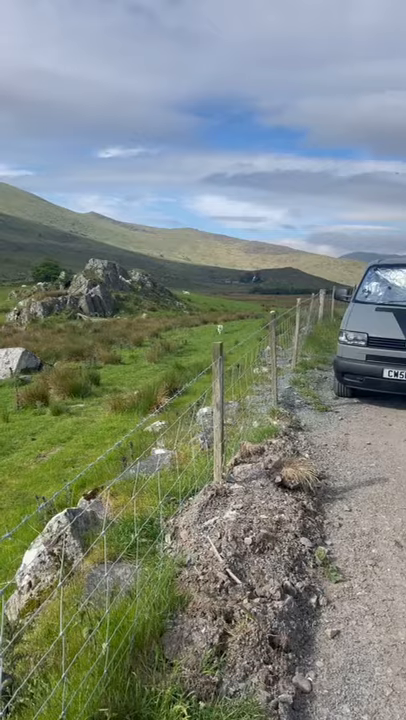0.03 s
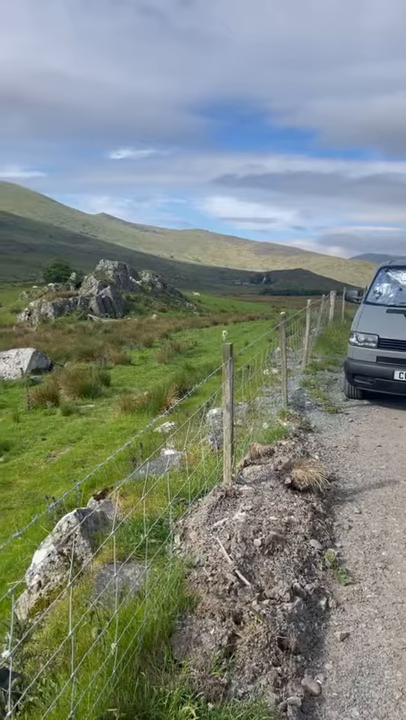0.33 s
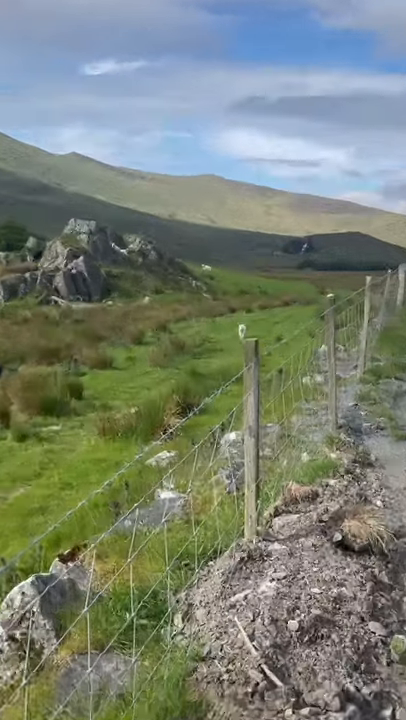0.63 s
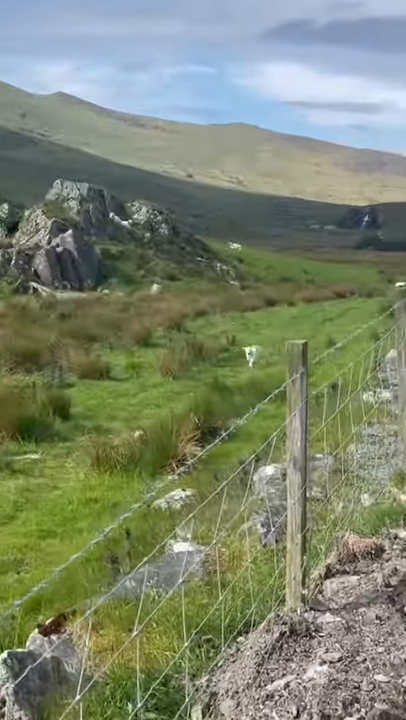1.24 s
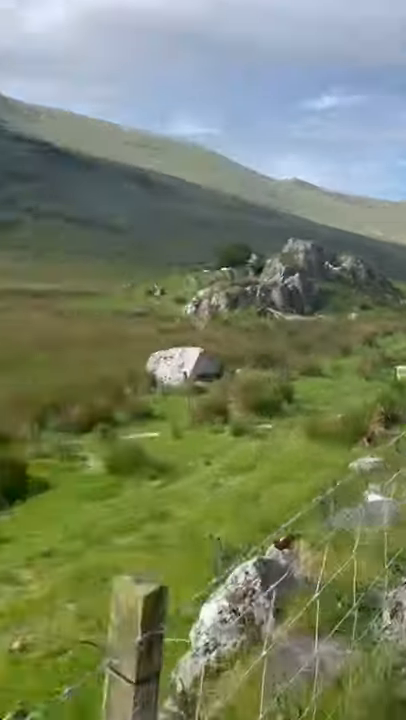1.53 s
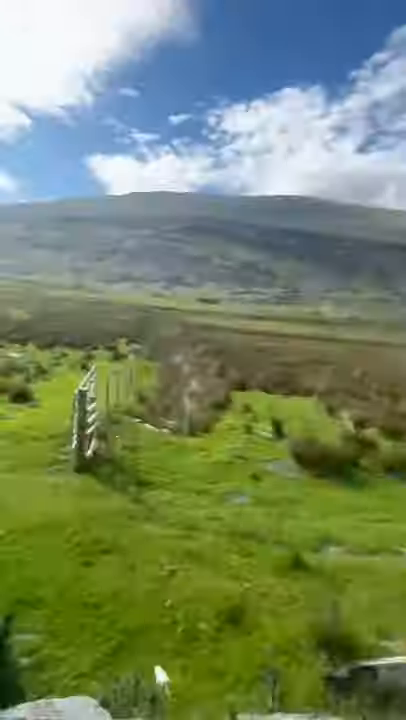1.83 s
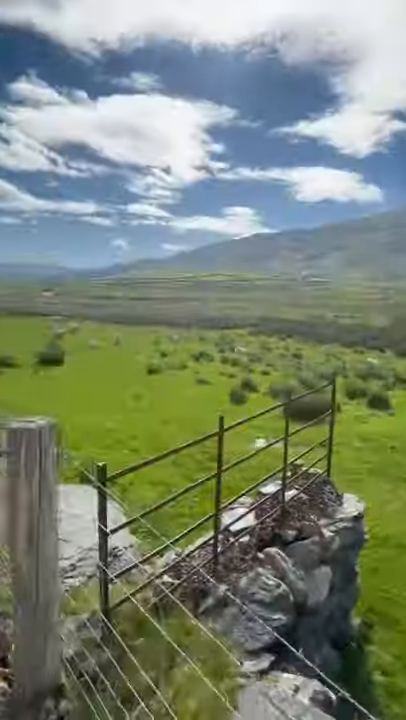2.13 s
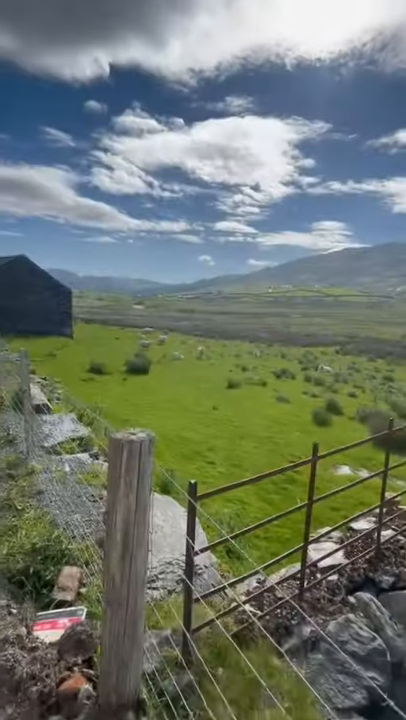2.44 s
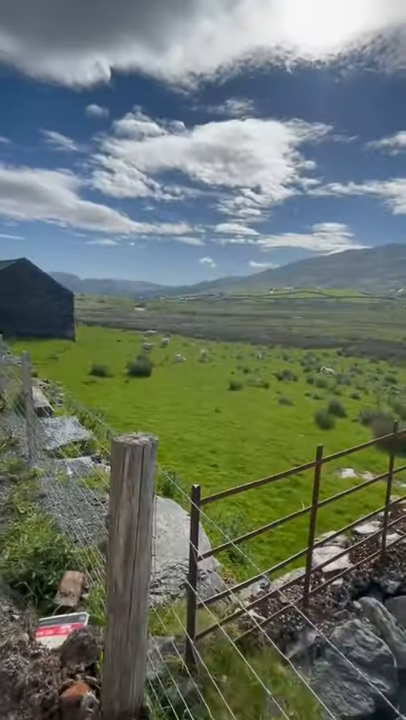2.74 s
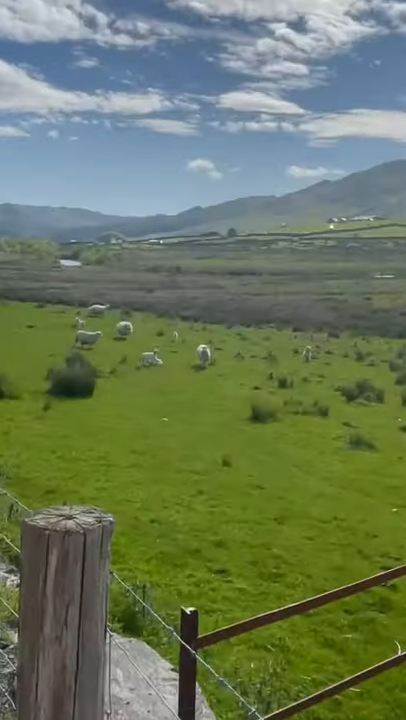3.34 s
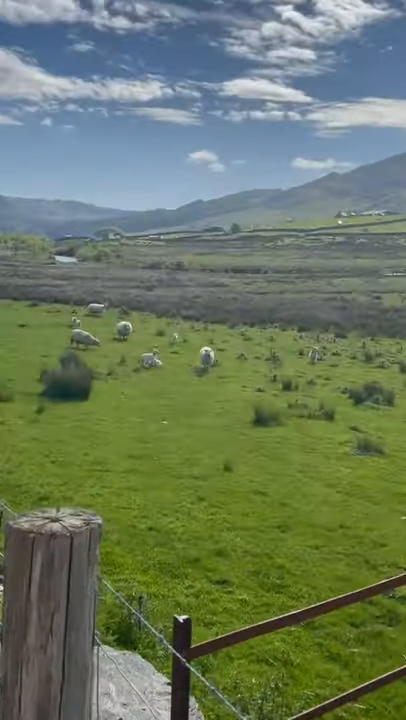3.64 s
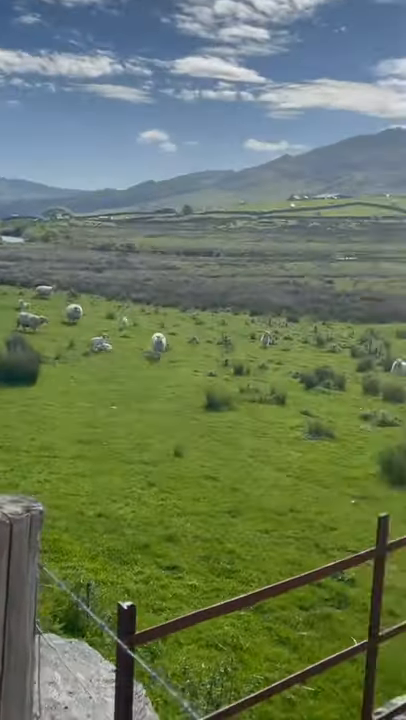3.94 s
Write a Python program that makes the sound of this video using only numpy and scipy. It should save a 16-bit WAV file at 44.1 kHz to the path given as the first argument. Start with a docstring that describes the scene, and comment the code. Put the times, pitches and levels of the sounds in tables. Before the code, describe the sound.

Sheep bleat back and forth, a high lamb and a low ewe, in gusty wind.

```python
"""Sheep on a breezy hill pasture. Over a faint wash of wind in the grass, gusts buffet the microphone
throughout. A lamb bleats, high and quavering: vocal fold pulses and breath ringing in its throat.
A far-off bird whistles up, then down, and the lamb calls again. A ewe answers, low and rattling,
each pulse a separate knock. The lamb's third bleat is long and off to one side, and the ewe
answers once more. Ground and stone walls scatter the calls."""
import sys
import numpy as np
from scipy import signal
from scipy.fft import rfft, irfft
from scipy.io import wavfile
from scipy.ndimage import uniform_filter1d

SR = 44100
rng = np.random.default_rng(int(sys.argv[2]) if len(sys.argv) > 2 else 0)


def file_out(sig):
    """Save sig as 16-bit WAV at sys.argv[1]."""
    # one column per channel
    cols = np.atleast_2d(sig).T
    # limit, then scale
    lim = np.clip(cols, -1, 1)
    pcm = np.round(lim * 32767).astype(np.int16)
    wavfile.write(sys.argv[1], SR, pcm)


N = 176400
T = np.arange(N) / SR
TOP_HZ = 12300  # top of the harmonics and of the whole mix
FLUTTER_DB, FLUTTER_HZ = 2.5, 50  # level flicker in the bands of both voices


def amp(db):
    """Decibels to gain."""
    return 10 ** (np.asarray(db) / 20)


def unit_rms(x):
    """Scales a signal to an rms of one."""
    return x / np.sqrt(np.mean(x ** 2) + 1e-20)


def leveller(x):
    """Holds the running level at one."""
    power = uniform_filter1d(uniform_filter1d(x ** 2, size=600), size=600)
    return x / np.sqrt(abs(power) + 1e-12)


def curve(rows, t, column=1):
    """Automation: one column of a breakpoint table at times t."""
    rows = np.array(rows, float)
    return np.interp(t, rows[:, 0], rows[:, column])


def at_hz(points, hz):
    """Reads a curve along a log frequency axis."""
    f, value = np.transpose(points)
    return np.interp(np.log(hz + 1), np.log(f + 1), value)


def add(mix, start_s, sound):
    """Lays a sound into the mix."""
    part = mix[max(round(start_s * SR), 0):][:len(sound)]
    part += sound[:len(part)]


def wander(size, hz):
    """Smooth random modulation, rms about one, rolling off above hz."""
    f = np.fft.rfftfreq(N, 1 / SR)
    return unit_rms(irfft(rfft(rng.standard_normal(N)) * np.exp(-(f / hz) ** 2), N))[:size]


def eq(x, points, cut_hz=0):
    """Minimum-phase EQ with an optional steep low cut."""
    f = abs(np.fft.fftfreq(4096, 1 / SR))
    gain = amp(at_hz(points, f)) / np.sqrt(1 + (cut_hz / (f + 1)) ** 8)
    log_gain = np.log(np.maximum(gain, 1e-5))
    taps = np.fft.ifft(np.exp(np.conj(signal.hilbert(log_gain)))).real[:2048]
    return signal.fftconvolve(x, taps)[:len(x)]


def resonate(x, hz, width_hz, order=1):
    """A unity-gain resonance that follows hz; higher orders have steeper skirts."""
    carrier = np.exp(2j * np.pi * np.cumsum(hz * np.ones(len(x))) / SR)
    lowpass = signal.butter(order, width_hz / 2, fs=SR, output="sos")
    return 2 * (carrier * signal.sosfilt(lowpass, x / carrier)).real


def pan_bands(x, points):
    """Tilts a sound left or right, band by band."""
    side_db = at_hz(points, np.fft.rfftfreq(N, 1 / SR))
    return irfft(rfft(x) * amp([side_db / 2, -side_db / 2]), N)


def grass_wash():
    """Wind over distant grass: faint, gently swelling stereo noise."""
    # Tone of the wash: freq_hz, gain_db
    tone = [(180, -19.5), (300, 4), (571, -17), (758, -1.5), (990, -1.5), (1310, -4.5), (3260, -27.5),
            (4000, -33), (12800, -41), (22000, -120)]
    centre, left, right = [unit_rms(eq(rng.standard_normal(N), tone)) for _ in range(3)]
    swell = amp(-62.5 + 4.7 * wander(N, hz=3.4))
    return swell * unit_rms(centre + 0.49 * np.array([left, right]))


def mic_wind():
    """Lumpy rumble on the microphone, and short puffs that each push it for a cycle or two."""
    # Tone of the rumble: freq_hz, gain_db
    tone = [(12, 2), (20, -31), (48, 9), (118, -2), (198, -8.5), (439, -22.5), (600, -37), (780, -70),
            (1320, -120)]
    # Rise and fall of the breeze: time_s, level_db
    breeze = [(.2,-52.5),(.7,-55.5),(1.05,-62),(1.3,-48),(1.7,-52.5),(1.88,-37),(2.05,-46.5),(2.3,-43.5),(2.62,-45.5),(2.77,-42.5),(2.95,-44.5),(3.08,-66.5),(3.17,-45.5),(3.55,-47.5),(3.68,-40),(4,-49.5)]
    # Puffs hitting the microphone, and at 0.48 s a low blip as the lamb's first bleat closes: time_s, level_db,
    # pitch_hz
    puffs = [(0.206, -43.5, 79), (.481,-46,605), (0.599, -39.5, 84), (0.836, -42.5, 138.3),
             (1.321, -38.5, 168), (1.852, -55, 95), (1.931, -32, 150), (2.002, -18, 108), (2.015, -25, 115),
             (2.208, -41, 100.5), (2.482, -28, 126.8), (2.587, -22, 225), (2.594, -42, 440),
             (2.728, -33, 166), (2.77, -32, 120), (2.884, -26.5, 114), (3.184, -29.5, 101),
             (3.208, -31, 149), (3.303, -36.5, 147), (3.681, -33, 102), (3.762, -28.5, 208.6),
             (3.894, -25.5, 128.1)]
    rumble = unit_rms(eq(rng.standard_normal(N), tone) * amp(2.5 * wander(N, hz=18)))
    out = rumble * amp(curve(breeze, T) + 3)
    t, attack_s = T[:SR // 10], 0.00604
    attack = np.sin(np.pi / 2 * np.minimum(t / attack_s, 1)) ** 2
    for time_s, db, hz in puffs:
        decay = np.exp(-np.maximum(t - attack_s, 0) * hz)
        push = np.sin(2 * np.pi * hz * t) + amp(0.5) * wander(len(t), 1.79 * hz)
        add(out, time_s - attack_s / 2, amp(db) * attack * decay * push)
    return signal.lfilter(*signal.butter(2, 48, "high", fs=SR), out)


def larynx(contour, hoarseness, jitter, shimmer_db, breath_cycles):
    """Vocal fold pulses and a puff of breath per cycle; hoarseness trades pulse for breath."""
    quaver, quaver_hz = 0.00389, 47.2
    slip_s = 0.00004  # hoarse folds close early or late, fraying the top harmonics
    closing_s = 0.000856  # each closure is spread out: its top harmonics lag by this much
    t = np.arange(contour[0][0], contour[-1][0], 1 / SR)
    size, pitch = len(t), curve(contour, t)
    mean_hz = pitch.mean()
    rough = np.clip(curve(hoarseness, t), 0, 1)
    hz = pitch * (1 + jitter * rough * wander(size, mean_hz) + quaver * wander(size, quaver_hz))
    cycles = np.cumsum(hz) / SR + pitch * rough * slip_s * wander(size, mean_hz)
    folds = sum(np.cos(2 * np.pi * k * cycles - np.pi * closing_s * (k * mean_hz) ** 2 / TOP_HZ)
                for k in range(1, int(TOP_HZ / pitch.min())))
    folds = unit_rms(folds * amp(shimmer_db * rough * wander(size, mean_hz)))
    airflow = 0.54 + np.exp(-(cycles % 1) / breath_cycles)
    breath = unit_rms(airflow * rng.standard_normal(N)[:size])
    return t, cycles, (1 - rough) * folds, rough * breath


def place_bleat(contour, t, sound, trim_db):
    """Gives a bleat its envelope and its place on the timeline."""
    out = np.zeros(N)
    fades = np.clip(np.minimum(t - t[0], t[-1] - t) / 0.0018, 0, 1)
    add(out, t[0], sound * fades * amp(trim_db + curve(contour, t, column=2)))
    return out


def lamb_bleat(contour, trim_db):
    """Pulses and breath pass moving resonances: clean low down, raspy higher up."""
    # Hoarseness: time_s, roughness (0-1)
    hoarseness = [(.215,0.97),(.255,0.42),(.3,0.09),(.38,.2),(.42,0.36),(.48,0.67),(1.08,0.76),(1.13,0.2),(1.27,0),(1.341,0.28),(1.48,0.4),(1.54,0.45),(2.56,0.35),(2.64,0.21),(2.74,0.05),(2.81,0.3),(2.969,0.06),(3.07,.15),(3.15,0.32),(3.27,0.12),(3.49,0.54)]
    # Throat resonances, levels relative to the mouth band:
    # time_s, mouth_hz, dip_db, throat_hz, throat_db, rasp_hz, rasp_db, shrill_db, fizz_db
    tract = [(0.21, 1560, 6, 2920, -14, 4570, -14, -8, -22),
             (0.255, 1300, -1, 3030, -2.5, 4550, 3, -0.5, -15),
             (0.31, 1410, -6, 3260, -4, 4760, 0.5, 3, -3), (0.37, 1450, -2.5, 3320, 1, 4800, -4, 2.5, -6.5),
             (0.42, 1440, -5, 3260, 1, 4200, -9, -1, -8),
             (0.48, 1380, -5.5, 3030, -4, 4320, -14, -5.5, -10.5),
             (1.085, 1290, 9, 3100, 10.5, 4400, 1, 5, -4),
             (1.15, 1380, -1.5, 3130, 3.5, 4680, 3.5, 2.5, -8.5),
             (1.26, 1420, -6.5, 3160, -1.5, 4570, 1, -3.5, -10.5),
             (1.34, 1425, -2.5, 3300, 3, 4300, -5, -2, -11.5),
             (1.41, 1410, -2, 3050, 3, 4200, -5, -0.5, -8.5), (1.45, 1420, -3, 3120, 1, 4550, -2, -1, -12),
             (1.51, 1422, -10, 3076, -11, 4600, -13.5, -8.5, -13),
             (2.57, 1228, -9, 2850, -0.5, 4710, 9.5, 8.5, -9),
             (2.65, 1370, -8, 3330, -6, 4720, 9.5, -1, -14.5),
             (2.73, 1395, -12.5, 3360, -8, 4380, 0, -7.5, -23.5),
             (2.8, 1330, -6, 3170, -3.5, 4580, 7, 1, -19.5),
             (2.86, 1348, -11.5, 3210, -5.5, 4600, -3.5, -13, -31),
             (2.91, 1340, -12, 3230, 1, 4350, 1, 2.5, -20.5),
             (2.97, 1310, -16, 3140, 1, 4820, -4.5, -4.5, -24),
             (3.05, 1335, -22, 3180, -2.5, 4840, 0.5, -10, -26.5),
             (3.1, 1300, -13, 3200, 3.5, 4400, -9, -12, -30),
             (3.16, 1310, -14, 3200, -3, 4170, -7.5, -13.5, -31),
             (3.27, 1300, -25, 3145, -7, 4450, -12, -14.5, -41),
             (3.37, 1283, -19, 3230, -6.5, 4500, -10, -8.5, -28.5),
             (3.47, 1320, -10.5, 3123, -9, 4397, -12.5, -16.5, -32)]
    # Mouth, dip, throat, rasp, shrill, fizz and chest bands: width_hz
    widths = (428, 540, 486, 696, 700, 1570, 137)
    # Colour of the nose: freq_hz, gain_db
    nose = [(3300,0.5),(3820,1.5),(4450,0),(5800,-1),(6500,9),(9000,5),(10200,-2)]
    dip_hz, shrill_hz, fizz_hz, chest_hz, chest_db = 2193, 5460, 10410, 754, -15.5
    t, _, folds, breath = larynx(contour, hoarseness, jitter=0.0402, shimmer_db=3.5, breath_cycles=0.94)
    mouth_hz, dip_db, throat_hz, throat_db, rasp_hz, rasp_db, shrill_db, fizz_db = [
        curve(tract, t, column) for column in range(1, 9)]
    bands = [(mouth_hz, 0), (dip_hz, dip_db), (throat_hz, throat_db), (rasp_hz, rasp_db),
             (shrill_hz, shrill_db), (fizz_hz, fizz_db), (chest_hz, chest_db)]
    voice = 0
    for (hz, level_db), width_hz in zip(bands, widths):
        hiss = breath * amp(-4 + 8.5 * np.log2(hz / 2980))  # 8.5 dB more breath per octave
        band = resonate(folds + hiss, hz, width_hz, order=3 if np.mean(hz) < shrill_hz else 2)
        voice = voice + leveller(band) * amp(level_db + FLUTTER_DB * wander(len(t), FLUTTER_HZ))
    return place_bleat(contour, t, leveller(eq(voice, nose)), trim_db)


def lamb():
    """Three bleats; the last is long, comes from one side and fades as the mouth closes."""
    # Bleat contours: time_s, pitch_hz, level_db
    first = [(.198,319,-59),(.212,317,-56),(.228,317.7,-58),(.245,306.8,-48.5),(.272,300.3,-47),(.288,373.4,-42.5),(.303,358,-38),(.318,362.3,-38.5),(.331,344.2,-39),(.353,376.7,-38.5),(.385,371.3,-38),(.398,349,-38.5),(.417,389.8,-40.5),(.445,334.8,-41),(.47,408,-42),(.482,323,-42),(.5,317.4,-43),(.525,310,-82)]
    second = [(1.06,355,-75),(1.077,378,-49),(1.093,323.6,-43.5),(1.112,374.5,-40.5),(1.146,387,-39),(1.162,380.6,-39),(1.18,391,-37),(1.197,386.8,-38.5),(1.22,417.6,-36.5),(1.245,411.5,-35),(1.268,432,-34.5),(1.326,379.8,-39),(1.344,434.7,-39.5),(1.362,376.3,-40.5),(1.391,383,-41),(1.407,427.4,-39),(1.453,359,-40),(1.485,376.3,-42),(1.51,352,-40),(1.525,320.6,-45.5),(1.545,290.6,-47.5)]
    third = [(2.54,355.2,-59),(2.562,359.7,-42),(2.574,319.3,-37.5),(2.586,362,-35),(2.612,354.4,-37),(2.643,402.3,-33.5),(2.666,390.5,-32.5),(2.695,407.6,-34),(2.728,438,-29.5),(2.765,407.8,-32),(2.789,385,-37),(2.807,446.3,-32),(2.829,382.6,-39),(2.852,395,-35.5),(2.872,427,-34.5),(2.89,417.3,-36),(2.904,394,-33),(2.925,377,-37.5),(2.953,394.7,-33.5),(2.998,393.3,-33.5),(3.031,428.7,-31),(3.052,398.3,-30),(3.07,399.7,-32),(3.1,369.6,-39.5),(3.131,356,-45.5),(3.144,417.7,-35),(3.162,377.3,-40),(3.19,369.5,-39.5),(3.204,386.3,-40),(3.216,362,-41.5),(3.228,375.3,-40),(3.26,347.4,-45),(3.294,359.2,-42),(3.321,338.3,-47),(3.352,398.3,-38.5),(3.37,387,-37),(3.394,350,-44.5),(3.411,397,-41),(3.433,342,-44.5),(3.465,355.6,-43),(3.477,393.5,-40),(3.49,338,-41.5),(3.51,328,-55)]
    # Off-axis tilt of the third bleat: freq_hz, left_minus_right_db
    side = [(60, 0.0), (110, -6), (200, 2), (350, 13), (640, -9.5), (1160, -5.5), (2090, 2.5), (3780, 3.5),
            (6830, 0.5), (12400, 1)]
    centred = lamb_bleat(first, trim_db=-2.5) + lamb_bleat(second, trim_db=-1)
    return centred + pan_bands(lamb_bleat(third, trim_db=-2), side)


def bird():
    """Two far-off whistles: pure, slightly wavering glides."""
    # Whistle contours: time_s, pitch_hz, level_db
    rising = [(.59, 2250, -74), (.66, 2710, -72), (.72, 2960, -76), (.785, 3530, -74), (.83, 3300, -106)]
    falling = [(.88, 5850, -83), (.895, 5225, -68.5), (.925, 4740, -77), (0.971, 4500, -69.5),
               (.997, 3750, -89)]
    out = np.zeros(N)
    for contour in (rising, falling):
        t = np.arange(contour[0][0], contour[-1][0], 1 / SR)
        hz = curve(contour, t) * (1 + 0.014 * wander(len(t), hz=150))
        envelope = amp(curve(contour, t, column=2)) * signal.windows.tukey(len(t), 0.1)
        add(out, t[0], np.sin(2 * np.pi * np.cumsum(hz) / SR) * envelope)
    return out


def ewe_bleat(contour, stages, trim_db):
    """Even knocks pass a throat that crossfades through stages of (time_s, tone)."""
    # Hoarseness: time_s, roughness (0-1)
    hoarseness = [(1.52,0.56),(1.66,0.33),(1.8,0.4),(2.15,0.34),(2.45,0.44),(3.5,0.6),(3.62,0.25),(3.69,0.61),(3.8,0.29),(3.9,0.33),(3.96,0.43)]
    # Gliding resonances: time_s, freq_hz, boost_db
    mouth = [(1.52,630,0.5),(2.45,760,1),(3.51,537.6,14),(3.55,671,2),(3.59,715,18),(3.63,700,6),(3.8,750,7)]
    nose = [(1.55,1620,10),(1.66,1570,-2),(1.88,1670,-2.5),(2.04,2260,-1),(2.13,2050,-1.5),(2.25,1919,-1),(3.52,1490,8),(3.56,1577,1),(3.62,1580,9.5),(3.67,2430,0),(3.73,1550,7),(3.85,1630,3.5),(3.96,2273,2.5)]
    t, cycles, folds, breath = larynx(contour, hoarseness, jitter=0.02, shimmer_db=4, breath_cycles=0.7)
    times, tones = zip(*stages)
    voice = 0
    for weights, tone in zip(np.eye(len(stages)), tones):
        voice = voice + np.interp(t, times, weights) * unit_rms(eq(folds + breath, tone, cut_hz=118))
    for glide, width_hz in ((mouth, 116), (nose, 140)):
        boost = amp(curve(glide, t, column=2)) - 1
        voice = voice + boost * resonate(voice, curve(glide, t), width_hz)
    treble = signal.filtfilt(*signal.butter(3, 3330, "high", fs=SR), voice)
    edge_db = 5.5 + FLUTTER_DB * wander(len(t), FLUTTER_HZ)
    voice = leveller(voice + treble * (amp(edge_db) - 1))
    return place_bleat(contour, t, voice + throat_cracks(t, cycles), trim_db)


def ewe():
    """Two low, rattling answers, the first off to one side."""
    # Bleat contours: time_s, pitch_hz, level_db
    first = [(1.52, 158.5, -48), (1.56, 165.4, -47.5), (1.59, 145.2, -44.5), (1.62, 163.6, -46.5),
             (1.66, 160.9, -45), (1.72, 162, -42.5), (1.742, 157.2, -37), (1.77, 150.1, -37),
             (1.785, 143.9, -44.5), (1.805, 162.2, -34.5), (1.84, 160.3, -39), (1.857, 144.4, -32.5),
             (1.885, 164.2, -37), (1.92, 153.8, -34.5), (1.948, 160.5, -35.5), (1.967, 145.5, -42.5),
             (1.985, 158.2, -33), (2.015, 163, -42), (2.033, 152.7, -34), (2.047, 139.4, -37),
             (2.065, 154.7, -36.5), (2.08, 148.6, -33.5), (2.1, 160.7, -36.6), (2.12, 141.6, -33),
             (2.145, 161.6, -37), (2.192, 154.9, -35), (2.205, 139.4, -39), (2.222, 146.4, -43.5),
             (2.233, 161.6, -33.5), (2.26, 154.2, -37), (2.278, 133.9, -48), (2.297, 145.2, -46.5),
             (2.313, 164.9, -32.5), (2.333, 155, -38.5), (2.352, 134.9, -43.5), (2.37, 134.7, -48),
             (2.386, 137, -36.5), (2.403, 151.7, -48), (2.423, 132.1, -40.5), (2.445, 127.6, -57),
             (2.48, 129, -61)]
    second = [(3.5, 145.5, -56.5), (3.518, 127.9, -36.5), (3.53, 143.9, -47), (3.545, 140.3, -36.5),
              (3.568, 129.7, -37.5), (3.59, 146.7, -37.5), (3.603, 146.3, -40), (3.62, 158.4, -29),
              (3.64, 152.4, -38), (3.664, 134.3, -30.9), (3.68, 137.4, -39.5), (3.7, 149.8, -33),
              (3.715, 153.9, -32.5), (3.735, 160.2, -31.8), (3.775, 156.7, -33), (3.8, 161, -32),
              (3.85, 162, -32.5), (3.885, 158.2, -34), (3.91, 162.5, -35.4), (3.93, 158.2, -37),
              (3.95, 157, -31.5), (3.972, 148.6, -35.5), (3.995, 164, -36.1), (4.003, 155.6, -50)]
    # Throat tone at each stage of a bleat: freq_hz, gain_db
    soft = [(82, -26), (140, -1), (179, -0.5), (409, -22), (630, -7), (952, -17.5), (1670, -7), (2480, -13),
            (3970, -42), (6120, -34), (6850, -98), (11000, -62), (12500, -84), (22000, -120)]
    wide = [(240, 1), (400, -7.5), (489, -6.5), (549, -20), (643, 2.5), (1030, -12.5), (1210, -11.5),
            (1590, 4.5), (1890, 0), (2530, 2), (3090, -12), (4180, -29), (4760, -34), (6080, -24.5),
            (12500, -75), (22000, -120)]
    rattle = [(240, -21), (400, -14), (475, -11.5), (534, -30), (625, 1), (787, 4), (1030, -9), (1550, 4.5),
              (2250, 8), (2800, 1.5), (3470, -24.5), (4500, -15), (6000, -23.5), (6630, -34),
              (12500, -49.5), (22000, -120)]
    opening = [(240, -85), (400, -12), (469, -14), (672, -2.5), (871, -23), (1550, -2.5), (1870, -6.5),
               (2420, -0.5), (3840, -29), (5910, -31), (6260, -102), (7030, -45), (12500, -67),
               (22000, -120)]
    full = [(180, -58), (300, -14.5), (462, -17.5), (629, -1.5), (1060, -12), (1430, 1), (1640, 5),
            (1910, -0.5), (2690, -1), (3130, -21.5), (3710, -30.5), (4140, -21), (4680, -22.5), (5300, -33),
            (7210, -45.5), (8950, -51), (10400, -40), (12000, -82), (22000, -120)]
    # Tilt of the first answer: freq_hz, left_minus_right_db
    side = [(350,-2.5),(800,9),(1900,-1.5),(5000,3.5),(12000,-3)]
    answer = ewe_bleat(first, [(1.71, soft), (1.75, wide), (1.94, wide), (2.05, rattle)], trim_db=-0.5)
    return pan_bands(answer, side) + ewe_bleat(second, [(3.58, opening), (3.63, full)], trim_db=0.5)


def throat_cracks(t, cycles):
    """Hard closures in the ewe's throat: bright noise ticks, each snapped to the nearest pulse."""
    # Hard closures: time_s, level_db
    cracks = [(1.772,-12),(1.868,-11),(1.965,4),(2.033,-3),(2.197,4),(2.232,5),(2.271,2),(2.312,-5),(2.344,2),(3.664,-6),(3.70,-4)]
    # Tone of a crack: freq_hz, gain_db
    tone = [(1500,-58),(3500,6),(6000,-3),(7000,-12),(12000,-20)]
    decay = np.exp(-T[:SR // 100] / 0.0021)
    bursts = np.zeros(len(t))
    for time_s, db in cracks:
        if t[0] < time_s < t[-1]:
            nearest_cycle = np.round(np.interp(time_s, t, cycles))
            add(bursts, np.interp(nearest_cycle, cycles, t) - t[0], amp(db) * decay)
    return eq(bursts * rng.standard_normal(N)[:len(t)], tone)


def pasture(x):
    """Quick scatter from ground and stone walls widens the sound; a faint open-air tail follows."""
    # Stereo width of the scatter: freq_hz, side_db
    width = [(200, -74.5), (400, -1), (650, -6), (1200, -43), (2100, -45), (3800, -7.5), (6800, -8),
             (12000, -10)]
    # Decay of the tail: freq_hz, t60_s
    t60 = [(200, 0.043), (1000, 0.14), (3000, 0.29), (6000, 0.28), (12000, 0.2)]
    scatter_s, tail_db = 0.0029, -12
    t = T[:SR // 2]
    scatter = rng.standard_normal(len(t)) * np.exp(-t / scatter_s) * (t > 0.001)
    scatter = eq(scatter / np.linalg.norm(scatter), width)
    hz, frame_s, noise = signal.stft(rng.standard_normal((2, len(t))), SR, nperseg=256)
    decay = amp(-60 * frame_s / at_hz(t60, hz)[:, None])
    tail = signal.istft(noise * decay, SR, nperseg=256)[1][:, :len(t)]
    impulse = np.array([scatter, -scatter]) + amp(tail_db) * tail / np.linalg.norm(tail[0])
    return x + signal.fftconvolve(x, impulse, axes=1)[:, :N]


def scene():
    """The animals in the open pasture, with the wind laid dry on top."""
    return pasture(lamb() + ewe() + bird()) + mic_wind() + grass_wash()


def record(dry):
    """The sound cuts in after a moment of silence and passes a steep low-pass."""
    start_s = 0.197
    gate = np.clip((T - start_s) / 0.0013, 0, 1)
    lowpass = signal.firwin(511, TOP_HZ, window=("kaiser", 9), fs=SR)
    return signal.oaconvolve(dry * gate, lowpass[None], "same")


dry = scene()
out = record(dry)
file_out(out)
```